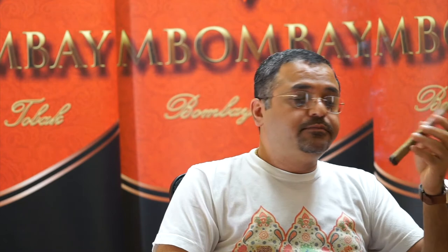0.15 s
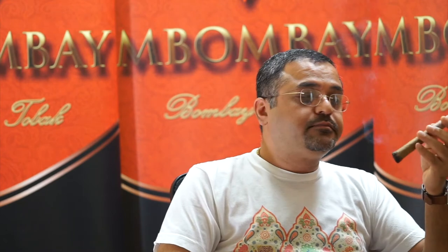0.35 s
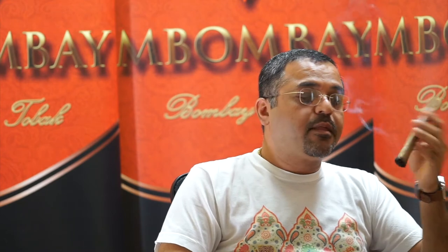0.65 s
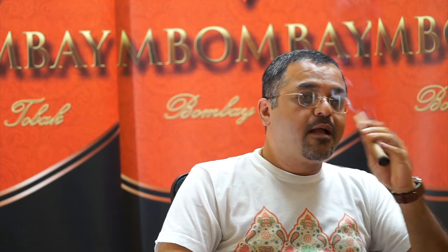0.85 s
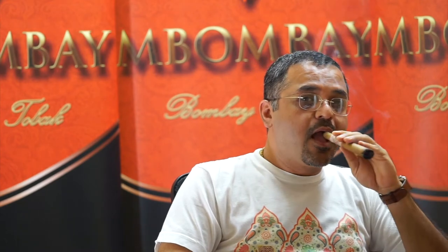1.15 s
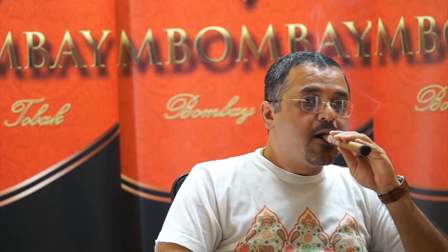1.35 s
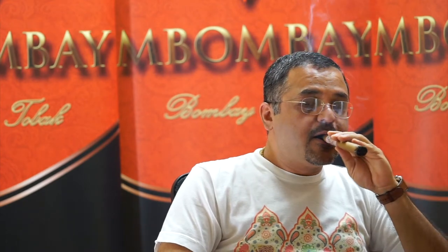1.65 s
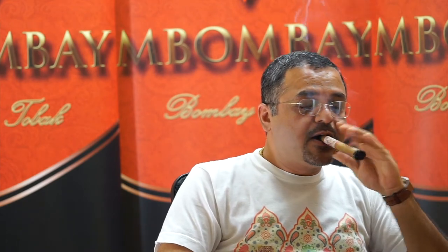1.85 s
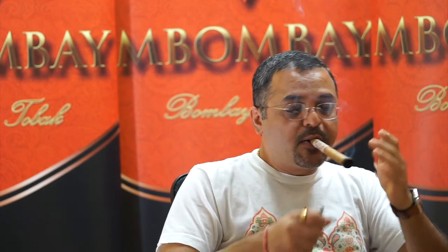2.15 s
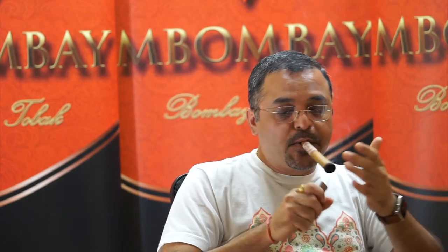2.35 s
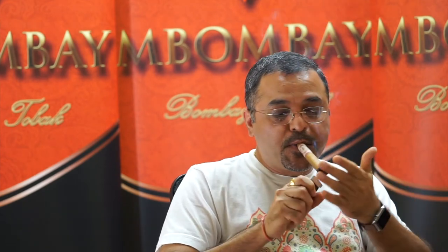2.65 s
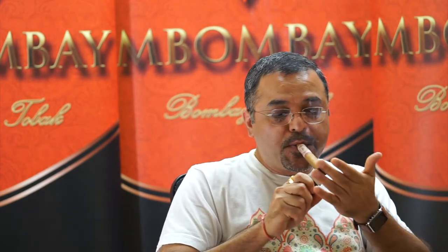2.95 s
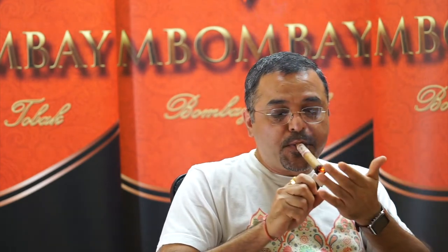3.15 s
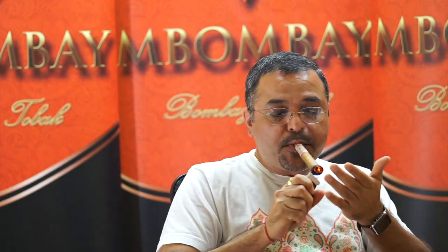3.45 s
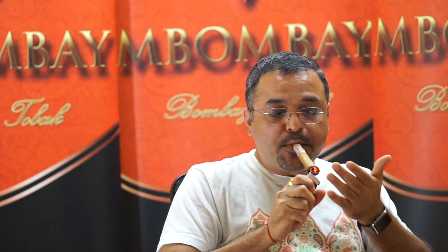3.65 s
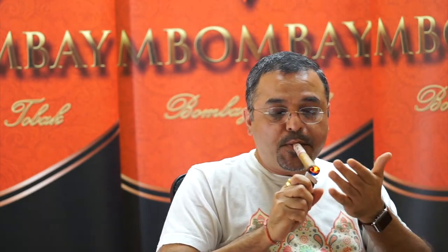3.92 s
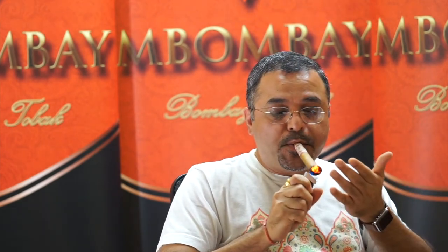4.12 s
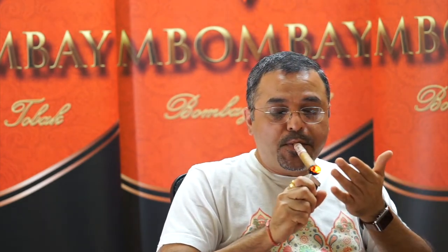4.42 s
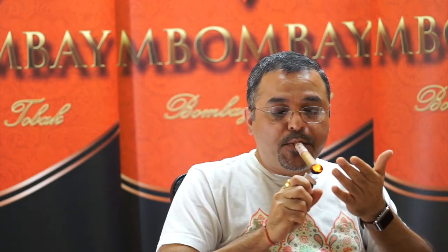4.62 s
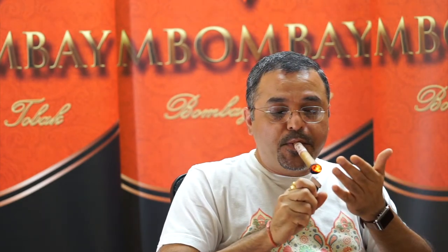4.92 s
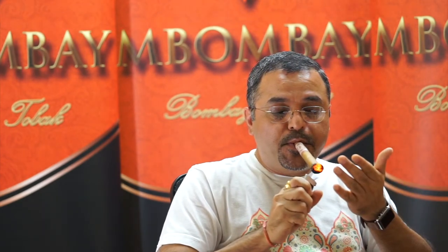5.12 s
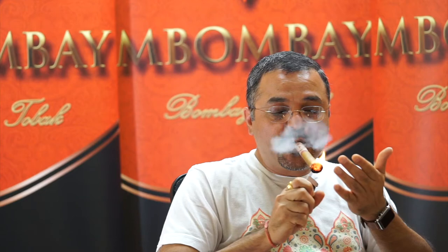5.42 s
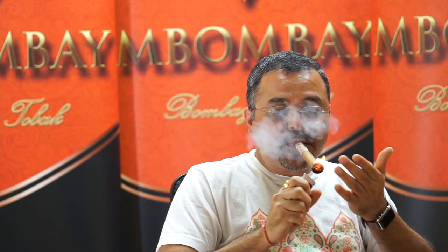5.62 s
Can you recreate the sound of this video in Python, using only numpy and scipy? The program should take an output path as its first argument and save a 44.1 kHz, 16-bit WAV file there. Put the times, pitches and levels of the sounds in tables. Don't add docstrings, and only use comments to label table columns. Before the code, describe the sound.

The room is filled with low ventilation hum, two motors slowly beating, duct rumble, soft air at the vents and faint microphone hiss. From the start a heavy engine drones outside, muffled by the wall; it quickly dips, then rises in pitch. Light hand and wristband touches come at about 0.3, 0.6 (the clearest knock), 1.0, 1.7 and 2.25 seconds. At 2.4 seconds gas bursts out in a bright hiss, and at 2.47 the igniter gives a hard, bouncing metallic snap with a short room echo and a low, soft pop. The young flame flutters and roars until about 2.9, then abruptly thins into a steady high hiss with a slight low body. Around 3.3 the hiss swells as the jet brushes the cigar. It continues to the end near 6 seconds, while the engine grows louder from 2.9, its deep tones wavering and its pitch levelling off.

```python
import sys
import numpy as np
from scipy import signal
from scipy.fft import rfft, irfft, next_fast_len
from scipy.io import wavfile
from scipy.ndimage import uniform_filter1d, map_coordinates

SR = 44100
rng = np.random.default_rng(int(sys.argv[2]) if len(sys.argv) > 2 else 0)


def elevation(decibels):
    levels = np.asarray(decibels, float)
    return 10 ** (levels / 20)


def put_to_file(sound):
    columns = np.atleast_2d(sound).T
    safe = np.clip(columns, -1, 1)
    whole_steps = np.round(safe * 32767)
    wavfile.write(sys.argv[1], SR, whole_steps.astype(np.int16))


N = 254661
CLOCK = np.arange(N) / SR

# frequency in Hz, level in dB per Hz.
RAW_GAS = [(3000, -31), (5000, -16), (5800, -5), (7200, -4), (9500, -13), (10500, -12), (12200, -3),
           (13700, -6), (14300, -16), (16500, -22)]
# frequency in Hz, level in dB per Hz.
JET_HISS = [(2000, -50), (3000, -9.5), (4000, -26), (5000, -25), (7000, -13), (9000, -6.5), (12000, -10),
            (14300, -24), (15200, -6), (16500, -13.5)]
# frequency in Hz, width in Hz, level in dB.
NOZZLE_WHISTLES = [(5880, 250, -5), (7340, 200, -6), (8260, 220, -3.5), (9710, 570, 2), (10930, 290, -3),
                   (11600, 230, -0.5), (13200, 880, -3.5)]
# frequency in Hz, level in dB per Hz.
YOUNG_ROAR = [(1500, -31), (2300, 1.5), (3200, -1.5), (4200, 1), (5000, -5), (5900, -2.5), (7000, -6),
              (9000, -13), (12000, -41)]
# frequency in Hz, level in dB per Hz.
FLAME_BODY = [(500, -34), (650, -3), (1000, -1.5), (1400, 0.5), (1700, 1.5), (1900, -10.5), (2300, -7.5),
              (3000, -23)]
# centre in seconds, gain in dB, length in seconds.
LICKS = [
    (2.9, 0.5, .15),
    (3.277, 3, 0.37),
    (4.5, -0.3, .2),
    (5.4, 0.5, 0.24),
]
# start in seconds, level in dB.
HAMMER = [
    (2.4692, -38),
    (2.46955, -22),
    (2.47005, -19),
    (2.47065, -19),
    (2.4723, -24),
    (2.4742, -29),
    (2.4776, -33),
]
# frequency in Hz, width in Hz, level in dB.
SHELL = [(2310, 100, -3.5), (3440, 120, 1), (3560, 920, -12), (4410, 467, -3), (5890, 240, 7.5),
         (6370, 330, 6.5), (7470, 920, -1), (9160, 810, -5.5), (11260, 500, -8), (12200, 1040, -16),
         (13500, 790, -9), (15300, 2000, -16)]
# frequency in Hz, level in dB per Hz.
SNAP_TO_WALLS = [(710, -21.5), (1200, -14.5), (1700, -12), (1890, -27.5), (2350, 2), (2680, -14),
                 (3050, -0.5), (5180, -10.5), (6030, -3.5), (11200, -14.5), (16000, -18)]
# frequency in Hz, level in dB, 60 dB decay in seconds.
POP = [(377, -25.5, 0.04), (277, -32, 0.061), (154, -32.5, 0.086)]
# start in seconds, peak in dB, centre in Hz, width in Hz, bright share in dB.
TAPS = [
    (0.342, -64, 4000, 500, -29),
    (0.6232, -44.5, 2980, 800, -8),
    (0.622, -56, 2280, 200, -33),
    (0.966, -70, 7060, 1500, -14),
    (0.973, -68, 7300, 1500, -21),
    (1.659, -70, 4300, 995, 1),
    (2.255, -65, 5800, 1500, 0),
]
# time in seconds, cycle rate in Hz, loudness in dB, echo lag in cycles,
# echo share from 0 to 1.
ENGINE = [(0, 22.18, -42, -1.2, .5), (.3, 21.92, -54, -1.1, 0.6), (.8, 23.26, -52.5, -1.14, 0.4),
          (1.2, 23.57, -56.5, -0.52, 0.1), (1.6, 24.81, -50, -0.61, 0), (1.9, 25.3, -47, -0.21, .3),
          (2.4, 26.1, -49, -0.1, 0.13), (2.9, 27.19, -40, 0.061, 0.6), (3.22, 26.92, -39, 0.18, 0.93),
          (3.7, 27.87, -40.5, 0.32, .7), (4.08, 28.07, -38, 0.537, 0.4), (4.42, 28.79, -37.5, 0.63, 0.47),
          (4.72, 29.1, -37, .83, 0.4), (5.12, 29.35, -38, 1.05, 0.54), (5.45, 29.42, -35, 1.17, 0.45),
          (5.77, 29.42, -37, 1.32, 0)]
# order, dB over the loudness, gain in dB per second,
# echo turn in cycles, least echo share from 0 to 1.
STEADY_ORDERS = [(3, 0.5, -0.5, -0.049, 0), (5, -15.5, 4, -.45, 0.85), (8, -21.5, -0.3, -0.44, 0.5),
                 (6, -28, -1, 0.081, 0.47), (1, -20.5, -4, 0.19, 0), (7, -28, -0.5, 0.28, .6)]
# centre in seconds, order, peak in dB, length in seconds.
ORDER_SWELLS = [(0.157, 8, -57.5, 0.52), (2.894, 8, -54.5, 0.34), (2.893, 12, -68, .15),
                (2.997, 11, -60.5, 0.31), (3.297, 11, -55, 0.34), (3.297, 10, -67, 0.96),
                (3.98, 11, -54.5, .35), (4.449, 11, -57, 0.14), (4.353, 9, -59.5, .3),
                (4.798, 11, -52, 0.42), (4.85, 12, -55, 0.45), (4.85, 13, -61.5, 0.53),
                (4.844, 9, -63, 0.44), (5.043, 10, -57.5, 0.37), (5.403, 9, -54.5, 0.64),
                (5.554, 10, -65, 0.16), (5.696, 13, -55, 0.24), (5.718, 8, -45.5, .15)]
# frequency in Hz, level in dB per Hz.
GROWL = [(110, -40), (150, -8.5), (250, -2.5), (330, 1.5), (430, -5), (500, -24.5), (900, -31), (2500, -45)]
# frequency in Hz, level in dB.
MOTORS = [(58.7, -36.3), (55.99, -45), (120.04, -47)]
# frequency in Hz, level in dB per Hz.
DUCT_RUMBLE = [(12, -41.5), (20, -12.5), (48, -9.5), (75, 0.5), (102, -11), (139, -9.5), (174, -16.5),
               (279, -22.5), (384, -18.5), (448, -25.5), (501, -49.5), (560, -48.5), (730, -82.5),
               (1230, -120)]
# frequency in Hz, level in dB per Hz.
VENT_AIR = [(280, -36), (480, -11.5), (549, -13), (613, 0.5), (770, -7.5), (1140, 1), (1210, -3.5),
            (1440, -2.5), (1590, -5), (1710, 0.5), (1850, -12.5), (2060, -5), (2250, -6.5), (2400, -7),
            (3600, -27), (4680, -50), (7920, -120)]
# frequency in Hz, width in Hz, level in dB.
VENT_SLATS = [(2143, 88, 0.5), (1737, 61, 0.5)]
# frequency in Hz, 60 dB decay in seconds.
ROOM_DECAY = [(300, 0.49), (2500, 0.22), (6000, 0.29), (14000, 0.16)]
# frequency in Hz, level in dB per Hz.
MIC_HISS = [(1760, -30.5), (3000, 1), (3180, -5), (4470, -5.5), (4870, -9), (6620, -9.5), (8320, -13.5),
            (14400, -21), (16500, -35)]
# frequency in Hz, share of time left empty from 0 to 1.
TREBLE_HOLES = [(6000, 0), (6800, .05), (7200, .01), (10000, .01), (10400, .2), (10800, .03), (12400, .1),
                (13400, .08), (14100, .4), (14700, .4), (15200, .08)]

VALVE_S = 2.41


def jet():
    since = np.clip(CLOCK - HAMMER[0][0], 0, None)
    lit = np.clip(since / 0.027, 0, 1)
    young = 1 - step(2.875, 0.0065)
    gas_db, young_db, steady_db, sag_s = -57.5, -64, -66, 0.07
    hiss_db = steady_db + (young_db - steady_db) * young
    hiss_db = hiss_db + (gas_db - young_db) * np.exp(-since / sag_s)
    hiss_db = hiss_db + sum(db * swell(s, length) for s, db, length in LICKS)

    burning = rush(JET_HISS, patchy_db=1.3, modes=NOZZLE_WHISTLES, lasting=30)
    hiss = (1 - lit) * rush(RAW_GAS, patchy_db=1.5) + lit * burning
    opening_s, leak_s = 0.0032, 0.014
    leak = elevation(-7) * step(VALVE_S - leak_s, opening_s)
    valve = np.maximum(step(VALVE_S, opening_s), leak)

    caught = 1 - np.exp(-since / 0.055)
    roar_gain = elevation(-91.5) + elevation(-69.5) * young
    roar = caught * roar_gain * rush(YOUNG_ROAR, patchy_db=0.8)
    body = lit * elevation(-70.5 + 3.5 * young) * rush(FLAME_BODY, patchy_db=0.2)
    flutter = elevation(0.5 * wobble(12))
    return flutter * (valve * elevation(hiss_db) * hiss + roar + body)


def igniter():
    s, db = np.transpose(HAMMER)
    blows = np.zeros(N)
    blows[np.round(s * SR).astype(int)] = -elevation(db + 15)
    since = np.clip(CLOCK - s[1], 0, 1)
    chatter = elevation(-19 - 60 * since / 0.032) * rng.standard_normal(N)
    blows += (since > 0) * chatter
    snap = filtered(blows, lambda hz: ringing(SHELL, hz) + elevation(-34))

    flash = 1.0 * (np.arange(N) == round(s[4] * SR))
    echo = room(filtered(flash, lambda hz: elevation(along(SNAP_TO_WALLS, hz))))

    age = np.clip(CLOCK - 2.4745, 0, 1)
    pop = sum(elevation(db - 60 * age / t60) * np.sin(2 * np.pi * hz * age) for hz, db, t60 in POP)
    pop = pop * (1 - np.exp(-age / 0.0048))
    pop = filtered(pop, lambda hz: 1 / np.sqrt(1 + (hz / 440) ** 12))
    return snap + echo - pop + elevation(-13) * room(pop)


def taps():
    out = np.zeros(N + SR)
    t = CLOCK[:SR // 20]
    for s, db, hz, width_hz, bright_db in TAPS:
        tick = elevation(-60 * t / 0.0099) * rng.standard_normal(len(t))
        b, a = signal.iirpeak(hz, hz / width_hz, fs=SR)
        knock = signal.lfilter(b, a, signal.lfilter(b, a, tick))
        crack = signal.lfilter(*signal.iirpeak(10000, 2.6, fs=SR), np.gradient(tick))
        knock = knock / abs(knock).max()
        crack = crack / abs(crack).max()
        out[round(s * SR):][:len(t)] += elevation(db) * (knock + elevation(bright_db) * crack)
    return out[:N]


def engine():
    cycle_hz, loud_db, lag, share = curves(ENGINE)
    age = CLOCK - 5

    steady = 0
    for order, db, gain_db, turn, least in STEADY_ORDERS:
        k = round(order)
        echo = np.clip(share, least, 1) * np.exp(2j * np.pi * (k * lag + turn))
        level_db = loud_db + db + gain_db * age + wobble(4.07)
        steady = steady + abs(1 + echo) * tone(k * cycle_hz, level_db)

    upper = 0
    for k in range(8, 14):
        swells = sum(elevation(db) * swell(s, length) for s, order, db, length in ORDER_SWELLS if round(order) == k)
        upper = upper + tone(k * cycle_hz, 1.6 * wobble(5.4)) * swells

    loudest_db = loud_db.max()
    growl_db = loudest_db + 0.6 * (loud_db - loudest_db)
    growl_db = growl_db - 18.5 + 3 * age + 1.2 * wobble(3.05)
    return steady + upper + elevation(growl_db) * rush(GROWL, patchy_db=0.35)


def ventilation():
    turn = 2 * np.pi * (CLOCK - 0.15)
    hum = 0
    for k, (hz, db) in enumerate(MOTORS):
        level = np.sqrt(2) * elevation(db + 0.14 * wobble(4.53))
        hum = hum + (-1) ** k * level * np.cos(hz * turn)
    rumble = elevation(-47.5) * rush(DUCT_RUMBLE, patchy_db=1.2)
    air = elevation(-68) * rush(VENT_AIR, patchy_db=1.7, modes=VENT_SLATS)
    return hum + rumble + air


def room(x):
    hz, t, z = signal.stft(rng.standard_normal(SR // 2), SR, nperseg=256)
    decay = elevation(-60 * t / along(ROOM_DECAY, hz)[:, None])
    tail = signal.istft(z * decay, SR, nperseg=256)[1]
    return signal.fftconvolve(np.pad(x, (150, 0)), tail / np.linalg.norm(tail))[:N]


def rush(spectrum, patchy_db, modes=(), lasting=12):
    z = signal.stft(rng.standard_normal(N + 512), nperseg=512)[2]
    field = uniform_filter1d(rng.standard_normal(z.shape), size=6, axis=0)
    field = uniform_filter1d(field, size=round(lasting), axis=1)
    x = signal.istft(z * elevation(patchy_db * unit(field)), nperseg=512)[1]

    def colour(hz):
        humps = sum(abs(ringing([mode], hz)) ** 2 for mode in modes)
        return np.sqrt(elevation(along(spectrum, hz)) ** 2 + humps)

    return unit(filtered(x, colour))


def tone(hz, db):
    return np.sqrt(2) * elevation(db) * np.sin(2 * np.pi * (np.cumsum(hz) / SR + rng.random()))


def ringing(modes, hz):
    total = 0
    for k, (centre, width, db) in enumerate(modes):
        peak = 1j * hz * width / (centre * centre - hz * hz + 1j * hz * width)
        total = total + (-1) ** k * elevation(db) * peak
    return total


def filtered(x, response):
    m = next_fast_len(N + SR // 4)
    return irfft(rfft(x, m) * response(np.fft.rfftfreq(m, 1 / SR)), m)[..., :N]


def unit(x):
    return x / np.sqrt(np.mean(x ** 2) + 1e-20)


def along(points, hz):
    f, v = np.transpose(points)
    return np.interp(np.log(hz + 1), np.log(f + 1), v)


def curves(rows):
    s, *cols = np.transpose(rows)
    return [np.interp(CLOCK, s, c) for c in cols]


def wobble(rate):
    return map_coordinates(rng.standard_normal(int(N * rate / SR) + 4), [CLOCK * rate])


def step(at, time):
    return 0.5 + 0.5 * np.tanh((CLOCK - at) / time)


def swell(at, length):
    return np.exp(-(2 * (CLOCK - at) / length) ** 2)


def treble_dropouts(x):
    hz, t, z = signal.stft(x, SR, nperseg=1024)
    chance = rng.standard_normal((len(hz) // 8 + 1, len(t)))
    chance = uniform_filter1d(chance, size=11, axis=1)
    chance = np.repeat(chance, repeats=8, axis=0)[:len(hz)]
    rank = chance.argsort(axis=1).argsort(axis=1) / len(t)
    steady = (abs(t - HAMMER[1][0]) > 0.03) & (t > VALVE_S)
    empty = (rank < along(TREBLE_HOLES, hz)[:, None]) & steady
    return signal.istft(z * np.where(empty, 0.02, 1), SR, nperseg=1024)[1][..., :N]


def scene():
    ticks = taps()
    near = igniter() + ticks + elevation(-1) * room(ticks) + jet()
    return (near + ventilation() + engine())[None]


def low_pass(x):
    return signal.sosfilt(signal.butter(12, 16930, fs=SR, output="sos"), x)


def record(dry):
    x = dry + elevation(-77) * rush(MIC_HISS, patchy_db=0.8)
    x = filtered(x, lambda hz: elevation(-np.clip((hz - 15680) / 4, 0, 31)))
    x = filtered(x, lambda hz: elevation(-6.5 * np.exp(-((hz - 10460) / 180) ** 2)))
    mix = treble_dropouts(x)
    return low_pass(mix)


dry = scene()
out = record(dry)
put_to_file(out)
```